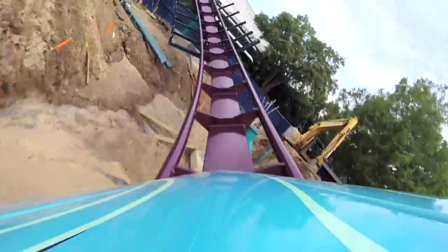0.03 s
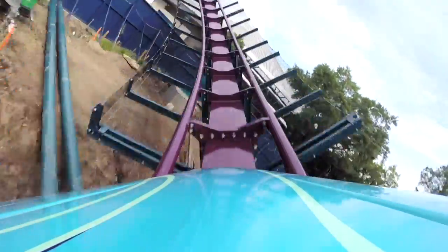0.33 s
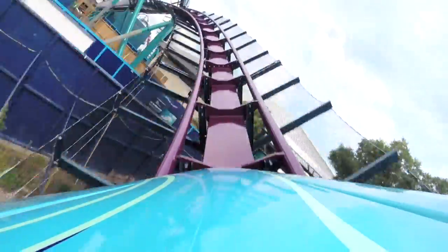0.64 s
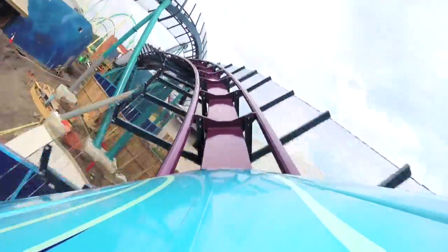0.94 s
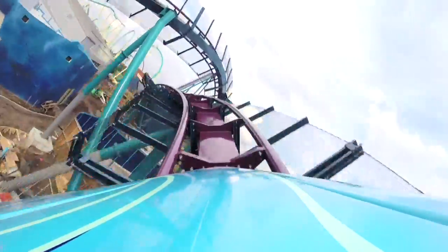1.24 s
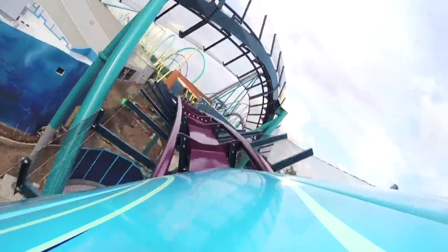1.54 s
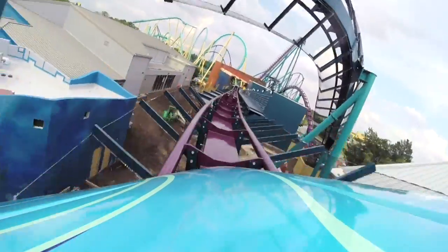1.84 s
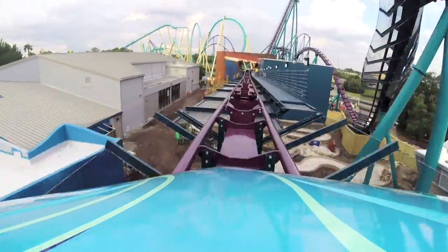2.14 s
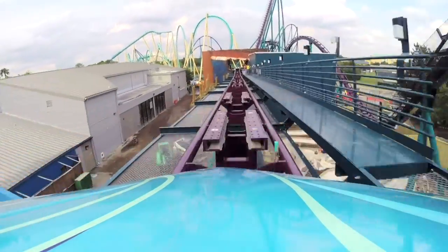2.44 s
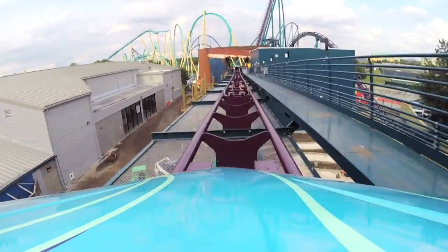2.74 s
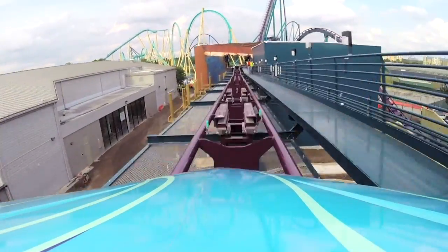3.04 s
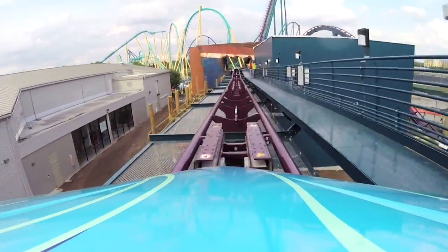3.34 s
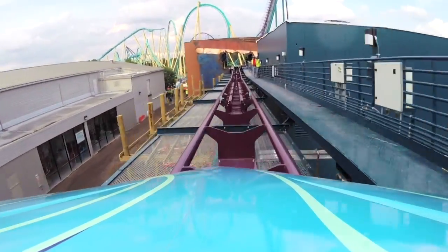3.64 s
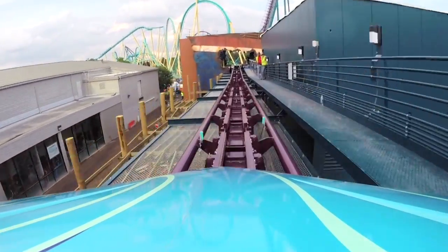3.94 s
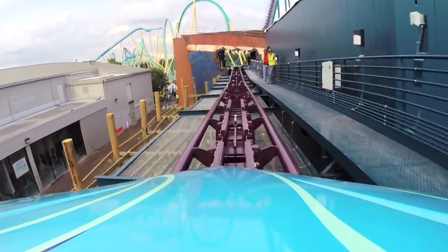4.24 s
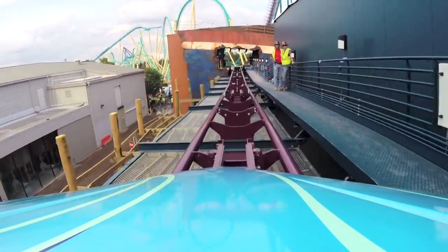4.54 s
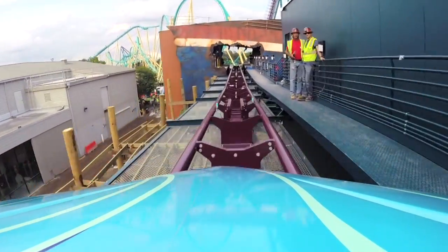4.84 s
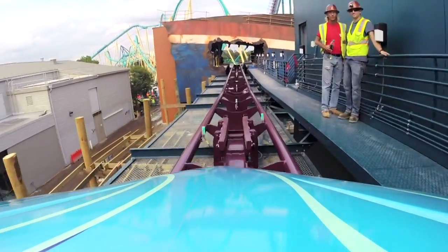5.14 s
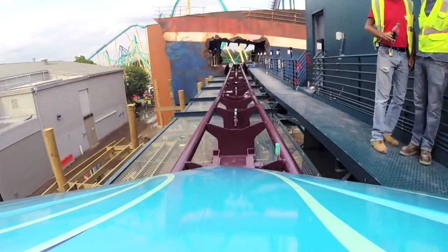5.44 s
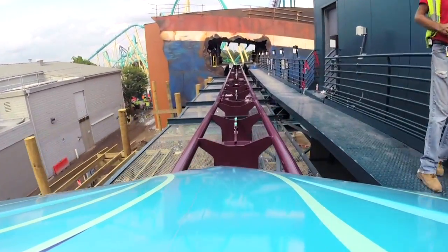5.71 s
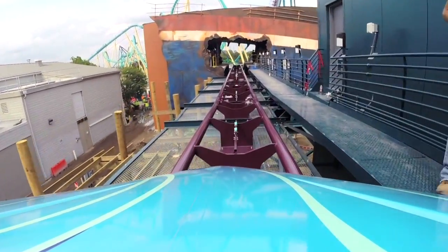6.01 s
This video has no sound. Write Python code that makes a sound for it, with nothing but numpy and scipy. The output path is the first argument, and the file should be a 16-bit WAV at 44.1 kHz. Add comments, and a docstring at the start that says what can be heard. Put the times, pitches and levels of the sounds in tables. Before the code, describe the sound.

A roller coaster train is heard close up from the nose of its front car, outdoors. From the start there is a deep rumble and a hollow, booming drone, with wheels roaring and rattling in surges. Rough rails knock the car at irregular moments, hardest around 0.1, 0.6, 1.1, 1.5, 2.0 and 2.6 seconds. Loose parts tick, and a thin wind hisses until about 2.7 seconds. From about 2.9 to 4.1 seconds the wheels judder in short, dense spells. At 4.2 seconds the brakes bite: five loud, ringing metal bangs follow in quick succession until about 4.9 seconds, over scraping and brief squeaks. A groaning tone sinks in pitch, dropping most just after 5 seconds. The scrape and rattle then fade, and the train rolls on more slowly with a low boom and a few small squeaks until about 6 seconds.

```python
"""A booming, rattling roar with hard jolts: a roller coaster train, heard from the front car's nose.
The wheels shake the nose shell and surge under load, rough rails knock the car, loose parts tick,
metal squeaks and a thin wind hisses past. From 4.2 s the train bangs through five brake units,
drags along them with a sinking groan and ringing steel, and rolls on more slowly."""
import sys
import numpy as np
from scipy import signal
from scipy.fft import rfft, irfft, next_fast_len
from scipy.io import wavfile
from scipy.ndimage import uniform_filter1d

SR = 44100
rng = np.random.default_rng(int(sys.argv[2]) if len(sys.argv) > 2 else 0)


def generate_wav(signal):
    """Clip the signal to [-1, 1] and save it as 16-bit WAV at the path in sys.argv[1]."""
    frames = np.transpose(np.atleast_2d(signal))
    scaled = np.clip(frames, -1, 1) * 32767
    pcm = np.round(scaled).astype(np.int16)
    wavfile.write(sys.argv[1], SR, pcm)


N = 272097
TIME_S = np.arange(N) / SR
BRAKES_GRIP_S, BRAKES_EASE_S = 4.212, 4.83


def from_db(db):
    """Decibels to gain."""
    return 10 ** (np.asarray(db) / 20)


def unit_rms(x):
    """Scale to rms 1."""
    return x / np.sqrt(np.mean(x ** 2) + 1e-20)


def curves(rows):
    """Each column after the time, interpolated at every sample."""
    times_s, *columns = np.transpose(rows)
    return [np.interp(TIME_S, times_s, column) for column in columns]


def noise():
    """White noise, rms 1."""
    return rng.standard_normal(N)


def steady(x, window_s):
    """Even out swells slower than the window; rms about 1."""
    size = int(window_s * SR) + 1
    power = uniform_filter1d(uniform_filter1d(x ** 2, size), size)
    return x / np.sqrt(np.abs(power) + 1e-14)


def wavering(hz, width_hz):
    """Noise-fed resonance: a tone of wandering strength and phase; rms 1."""
    pole = np.exp(-2 * np.pi * width_hz / SR)
    drift = signal.lfilter([1], [1, -2 * pole, pole * pole], rng.standard_normal((2, N + SR)))[:, SR:]
    phase = 2 * np.pi * np.cumsum(hz * np.ones(N)) / SR
    return unit_rms(drift[0] * np.cos(phase) + drift[1] * np.sin(phase))


def burst(start_s, rise_s, decay_s):
    """Envelope of one blow: quick rise, exponential fall."""
    age_s = np.clip(TIME_S - start_s, 0, 30 * decay_s)
    return (1 - np.exp(-age_s / rise_s)) * np.exp(-age_s / decay_s)


def swell(start_s, rise_s):
    """Envelope that peaks at 1 after rise_s, then dies."""
    age = np.clip((TIME_S - start_s) / rise_s, 0, 30)
    return age * np.exp(1 - age)


def impulses(times_s, levels_db):
    """One impulse at each time."""
    out = np.zeros(N)
    out[np.round(np.asarray(times_s) * SR).astype(int)] = from_db(levels_db)
    return out


def smear(hits, rise_s):
    """Turn each impulse into a swell of the same height."""
    pole = np.exp(-1 / (rise_s * SR))
    return signal.lfilter([np.e / (rise_s * SR)], [1, -2 * pole, pole * pole], hits + 1e-18)


def chatter(shake, floor, grain_db, window_s):
    """Loose contacts buzz above a floor, hardest on big shell swings; slow swells are evened out."""
    swing = np.maximum(shake, 0) ** 2
    return steady(noise() * (floor + swing) * from_db(grain_db * noise()), window_s)


def coasting_s():
    """Time since the brakes began to ease off."""
    return np.maximum(TIME_S - BRAKES_EASE_S, 0)


def brakes_on(attack_s=0.01):
    """Ramp from 0 to 1 as the brakes bite."""
    return np.clip((TIME_S - BRAKES_GRIP_S) / attack_s, 0, 1)


def brake_grip(release_s=0.6):
    """Brake force, 0-1: attack, hold, release."""
    return brakes_on() * np.exp(-coasting_s() / release_s)


# Nose shell resonances: (frequency [Hz], width [Hz], lift [dB])
SHELL_RESONANCES = [(361, 11, 2.5), (389.3, 60, 6), (545, 86, 7), (650, 15, -5), (883.5, 170, 6.5),
                    (1568, 170, 10), (1980, 250, 2.5), (2340, 440, 3), (4100, 1400, 3.5), (5300, 1600, 5.5)]


def through_shell(x, spectrum):
    """Filter by a source's spectrum and the shell's resonances; white noise keeps its level."""
    size = 2 * next_fast_len(N // 2 + SR // 4)
    hz = np.arange(size // 2 + 1) * SR / size
    points_hz, points_db = np.transpose(spectrum)
    gain_db = np.interp(np.log(hz + 1), np.log(points_hz), points_db)
    for centre_hz, width_hz, lift_db in SHELL_RESONANCES:
        gain_db += lift_db / (1 + (2 * (hz - centre_hz) / width_hz) ** 2)
    cepstrum = irfft(np.log(unit_rms(from_db(gain_db))))
    cepstrum[1:size // 2] *= 2
    cepstrum[size // 2 + 1:] = 0   # minimum phase: nothing rings before its cause
    return irfft(rfft(x, size) * np.exp(rfft(cepstrum)), size)[:N]


# Airstream: (time [s], level [dB])
WIND_LEVELS = [(0, -57), (.2, -62), (.6, -59.5), (.68, -67), (1.0, -61.5), (1.45, -62.5), (1.6, -68),
               (1.85, -63), (2.58, -59.5), (2.68, -70), (4.1, -76), (6.13, -75)]
# Air hiss: (frequency [Hz], relative level [dB])
WIND_SPECTRUM = [(1000, -8), (3300, 5), (4100, 0), (4750, -4), (5400, -2), (6500, -4), (8000, -9),
                 (10000, -16), (12000, -23), (16000, -36)]


def wind(shake):
    """Thin hiss of the airstream, fluttering as the nose shakes."""
    wind_db, = curves(WIND_LEVELS)
    flutter = chatter(shake, floor=2.2, grain_db=1, window_s=0.29)
    return from_db(wind_db) * through_shell(flutter, WIND_SPECTRUM)


# Bounce and buffeting: (time [s], relative level [dB])
RUMBLE_LEVELS = [(0.0, -15.5), (1.44, -14.5), (1.48, -21.5), (2.0, -13.5), (2.04, -21), (2.16, -13.5),
                 (2.21, -32), (2.31, -10), (2.89, -20), (3.5, -16), (3.6, -20), (4.11, -15.5), (4.3, -27),
                 (5.27, -22), (5.4, -12), (6.1, -17)]
# Air buffeting: (frequency [Hz], relative level [dB])
BUFFET_SPECTRUM = [(10, -22.5), (20, 0.5), (30, 4.5), (48, -3), (62, -15.5), (85, -4), (150, -32),
                   (2000, -110)]


def low_rumble(gain_db=-1):
    """The car bounces on its sprung wheels while the airstream buffets the nose."""
    rumble_db, = curves(RUMBLE_LEVELS)
    bounce = wavering(hz=41.5, width_hz=5)
    buffet = from_db(-6) * through_shell(noise(), BUFFET_SPECTRUM)
    return from_db(rumble_db + gain_db) * steady(bounce + buffet, window_s=0.51)


# Metal squeaks, pings, moans: (time [s], pitch [Hz], width [Hz], level [dB], half-length [s])
METAL_SQUEAKS = [(0.725, 3020, 230, -50, 0.0027), (3.371, 3460, 500, -42.5, 0.0011),
                 (4.488, 1353, 90, -27, 0.023), (4.494, 1585, 50, -36, 0.024), (4.66, 1353, 60, -34, 0.025),
                 (4.775, 1546, 80, -25, 0.0092), (4.947, 1506, 120, -28, 0.014),
                 (4.943, 3670, 900, -52, 0.015), (5.326, 856, 50, -32, 0.014),
                 (5.488, 2950, 200, -47, 0.0032), (5.655, 360, 50, -20, 0.029),
                 (5.818, 1063, 50, -37, 0.008), (5.833, 771, 45, -29.5, 0.016),
                 (5.839, 2520, 250, -54, 0.012), (5.842, 1796, 250, -51, 0.02),
                 (6.093, 669.6, 23, -35, 0.033), (6.096, 2377, 200, -58.5, .014)]


def squeaks():
    """Metal rubs or pings briefly at a rough pitch."""
    out = 0
    for time_s, hz, width_hz, level_db, half_s in METAL_SQUEAKS:
        tone = steady(wavering(hz, width_hz), window_s=0.0068)
        envelope = np.exp(-((TIME_S - time_s) / half_s) ** 2)
        out += from_db(level_db) * envelope * tone
    return out


# Sharpest ticks of loose parts: (time [s], relative level [dB])
SHARP_TICKS = [(0.122, -36), (0.148, -50), (0.158, -41.5), (0.3017, -33.5), (0.316, -46), (0.617, -44),
               (0.7243, -39.5), (0.945, -34), (1.126, -41), (1.212, -40.5), (1.3857, -35), (1.4972, -33),
               (1.5335, -55), (1.935, -36), (2.376, -34), (2.4154, -36), (2.6085, -33), (2.622, -34),
               (2.7232, -34.5), (3.1592, -45), (3.2265, -43), (3.3692, -37), (3.384, -40), (3.4934, -46),
               (3.5244, -37.5), (3.572, -47), (3.675, -38), (3.7204, -42), (3.7369, -43), (3.8366, -41),
               (3.877, -50), (3.924, -45), (3.9404, -45), (3.949, -42), (3.9798, -44), (4.0652, -40.5),
               (4.113, -43), (4.179, -41), (4.2248, -27), (4.255, -37), (4.3231, -36.5), (4.361, -30),
               (4.5191, -43), (4.571, -40), (4.5825, -31), (4.6952, -35), (4.7641, -37), (4.7715, -39),
               (4.8269, -37), (4.858, -36), (4.8963, -39), (4.9162, -41), (5.0723, -45), (5.1936, -44),
               (5.2485, -43.5), (5.3238, -44), (5.3567, -45), (5.4056, -36.5), (5.4445, -45),
               (5.4889, -33.5), (5.7588, -39.5)]
# Faint touches of loose parts: (time [s], relative level [dB])
STRAY_LEVELS = [(0, -49), (2.5, -51), (3.5, -47), (4.2, -46), (4.7, -42), (5.05, -50), (5.4, -52),
                (5.9, -65)]
# Dry tick: (frequency [Hz], relative level [dB])
TICK_SPECTRUM = [(600, -7), (1500, 2), (2500, 4), (3400, 3), (4700, -2), (5500, 0), (7300, -.5), (9000, -8),
                 (11000, -14), (15000, -32)]


def ticks(shake, play_rms=1.75, jolt_db=-26, clank_db=-29):
    """Loose parts tick on jolts and clanks, and faintly when the shell swings past their play."""
    sharp = impulses(*np.transpose(SHARP_TICKS))
    on_jolts = impulses(*np.transpose(RAIL_JOLTS)[:2])
    on_clanks = impulses(*np.transpose(BRAKE_CLANKS)[:2])
    knocks = sharp + from_db(jolt_db) * on_jolts + from_db(clank_db) * on_clanks
    stray_db, = curves(STRAY_LEVELS)
    touches = np.diff((shake > play_rms).astype(float), prepend=0) > 0
    strays = touches * from_db(stray_db + 3.5 * noise())
    contacts = smear(from_db(-9) * knocks + from_db(-16) * strays, rise_s=0.00055)
    return through_shell(contacts * noise(), TICK_SPECTRUM)


# Wheel drone: (time [s], pitch [Hz])
DRONE_PITCH = [(0, 182.4), (.45, 186), (.85, 201), (1.2, 195), (1.5, 168.8), (2.5, 160.6), (2.75, 186.4),
               (3.05, 189.3), (3.3, 174.8), (3.6, 159.1), (3.8, 174.9), (4.1, 171.6), (4.5, 192.3),
               (6.13, 183)]
# Low nose panel modes: (frequency [Hz], width [Hz], relative level [dB])
PANEL_MODES = [(113.3, 5.1, -1.5), (161.3, 28, -1), (202.3, 11, -7), (249.1, 18, -9)]
# Shell boom: (time [s], panel level [dB], drone level [dB])
BOOM_LEVELS = [(0, -20, -21), (0.9, -21, -21.5), (1.6, -19.5, -26), (2.5, -19.5, -23), (2.9, -24, -18),
               (4.1, -18, -18), (4.45, -25, -24.5), (5.25, -16, -28), (6.13, -20, -33.5)]


def shell_boom():
    """The nose booms with its panel modes and the wheels' drone."""
    drone_hz, = curves(DRONE_PITCH)
    panel_db, drone_db = curves(BOOM_LEVELS)
    modes = sum(from_db(db) * wavering(hz, width_hz) for hz, width_hz, db in PANEL_MODES)
    panels = steady(modes, window_s=0.45)
    drone = steady(wavering(drone_hz, width_hz=13.6), window_s=0.13)
    return from_db(panel_db) * panels + from_db(drone_db) * drone


# Spells of wheel judder: (start [s], length [s], level [dB])
JUDDER_SPELLS = [(0.08, 0.036, -40), (0.842, 0.062, -44.5), (1.021, 0.043, -41.5), (1.089, 0.037, -39.5),
                 (2.208, 0.035, -37.5), (2.544, 0.039, -41), (2.753, 0.051, -39), (2.881, 0.243, -37.5),
                 (3.215, 0.052, -35.5), (3.29, 0.047, -39.5), (3.381, 0.058, -40.5), (3.485, 0.062, -40.5),
                 (3.623, 0.024, -34), (3.669, 0.096, -36.5), (3.786, 0.02, -41.5), (3.886, 0.07, -36.5),
                 (3.978, 0.041, -38.5), (4.058, 0.013, -34.5), (4.113, .012, -36)]
# Wheel judder: (frequency [Hz], relative level [dB])
JUDDER_SPECTRUM = [(300, -7), (700, 16), (1000, 5), (1250, -3), (1700, -1), (2100, 0.5), (2550, -3.5),
                   (3000, -18), (4200, -27), (5500, -32), (15000, -72)]


def judder(shake, edge_s=0.0018):
    """The wheels judder in a dense rattle that sets in, holds and stops."""
    envelope = 0
    for start_s, length_s, level_db in JUDDER_SPELLS:
        inside_s = np.minimum(TIME_S - start_s, start_s + length_s - TIME_S)
        envelope += from_db(level_db) * np.clip(inside_s / edge_s + 0.5, 0, 1)
    buzz = chatter(shake, floor=3.6, grain_db=1.5, window_s=0.021)
    return envelope * through_shell(buzz, JUDDER_SPECTRUM)


# Rolling wheels: (time [s], relative roar [dB], relative rattle [dB])
ROLLING_LEVELS = [(0.0, -30, -45.5), (0.2, -37, -55), (0.85, -37.5, -56), (0.98, -33.5, -54),
                  (2.47, -34.5, -50), (2.7, -38.5, -49.5), (3.04, -32, -51.5), (3.96, -35, -55.5),
                  (4.15, -32.5, -52)]
# Wheels pressing harder on the rails: (time [s], extra roar [dB], extra rattle [dB])
LOAD_SURGES = [(0.109, 0.5, -1), (0.59, 6.5, 2.5), (1.101, 2.5, 0.5), (1.49, 2.5, 4.5), (1.889, 6.5, 2),
               (2.31, 6, 0.5), (2.59, 8, -0.5), (2.921, 3, 4.5), (3.3, 3, 3.5), (3.73, 5, 3),
               (4.001, 4, -1)]
# Wheel roar: (frequency [Hz], relative level [dB])
ROAR_SPECTRUM = [(120, -20), (250, -2.5), (330, -0.5), (450, -5.5), (650, -15), (900, -26.5), (1200, -32),
                 (2000, -47), (5000, -79), (15000, -120)]
# Wheel rattle: (frequency [Hz], relative level [dB])
RATTLE_SPECTRUM = [(300, -11.5), (700, 13), (1200, -2), (1700, -0.5), (2550, -6), (3100, -15.5),
                   (4200, -25.5), (4750, -30.5), (5500, -26.5), (7000, -40), (10000, -44), (15000, -63.5)]


def wheels(shake, roar_fade_db_per_s=6, rattle_fade_db_per_s=8.5, surge_half_s=0.087, thinning_s=0.25):
    """Rolling roar and rattle pulse with the shell, surge under load and fade as the train coasts."""
    roar_db, rattle_db = curves(ROLLING_LEVELS)
    roar_db += 2.5 - roar_fade_db_per_s * coasting_s()
    rattle_db += 8 - rattle_fade_db_per_s * coasting_s()
    for time_s, extra_roar_db, extra_rattle_db in LOAD_SURGES:
        load = np.exp(-((TIME_S - time_s) / surge_half_s) ** 2)
        roar_db += extra_roar_db * load
        rattle_db += extra_rattle_db * load
    roar = through_shell(chatter(shake, floor=1.7, grain_db=1.5, window_s=0.13), ROAR_SPECTRUM)
    floor = 0.78 * np.exp(-coasting_s() / thinning_s)   # rattle breaks into separate chatters
    rattle = through_shell(chatter(shake, floor, grain_db=2.5, window_s=0.092), RATTLE_SPECTRUM)
    return from_db(roar_db) * roar + from_db(rattle_db) * rattle


# Worst rail spots, relative levels: (time [s], knock [dB], clatter [dB], clatter rise [s], thump [dB])
RAIL_JOLTS = [(0.086, -19, -13.5, .0045, 2), (0.118, -22, -17, 0.0038, 3), (0.148, -25, -22, .002, -9),
              (0.156, -25, -15, .002, -10.5), (0.298, -23.5, -18.5, 0.0015, 0.5),
              (0.395, -29.5, -24.5, 0.0032, -18), (0.469, -27, -19, .0025, -4),
              (0.6, -19.5, -19.5, 0.0018, 2), (0.614, -24.5, -16, 0.0017, -5),
              (0.656, -25.5, -21.5, 0.0013, -20), (0.768, -31, -23, 0.0045, -13),
              (0.864, -31, -21.5, 0.0039, -1), (0.897, -27.5, -17, .002, -2),
              (0.91, -25.5, -18, 0.0018, -0.5), (0.937, -24, -20, .0015, -14),
              (1.017, -25.5, -19.5, 0.0017, -3.5), (1.125, -18.5, -14.5, 0.0014, 0),
              (1.154, -20, -15.5, .0025, -10), (1.209, -24.5, -20.5, 0.0026, -23),
              (1.292, -25, -24.5, 0.0015, -22), (1.316, -25.5, -23.5, .002, -17),
              (1.367, -28.5, -23.5, 0.0031, -14), (1.451, -26.5, -20, .002, -8),
              (1.495, -13, -13, .0014, 1), (1.532, -18.5, -12.5, 0.0014, -7),
              (1.933, -29, -22, 0.0027, -14), (2.036, -19.5, -14, 0.0026, -0.5),
              (2.279, -26, -22.5, 0.0058, -3), (2.389, -27, -23, 0.0014, -6.5),
              (2.583, -22, -19.5, .002, -22), (2.595, -20, -18.5, 0.0052, -6), (2.608, -18, -23, 0.0016, 0),
              (2.882, -20, -15, .003, -1.5), (2.968, -27.5, -24.5, 0.0017, -8.5),
              (3.078, -27, -16.5, .003, -4), (3.163, -28.5, -21, .002, -9),
              (3.25, -24.5, -19, 0.0028, -4.5), (3.31, -24.5, -20.5, 0.0022, -12),
              (3.359, -21, -17.5, 0.0027, -3.5), (3.492, -25, -19, 0.0022, -8.5),
              (3.572, -26, -17.5, 0.0026, -13.5), (3.671, -30, -24.5, 0.0021, -5),
              (3.736, -22, -14, 0.0027, -2), (4.171, -21, -14, 0.0038, 2.5), (5.296, -22, -23, .002, -14),
              (5.807, -30, -28, 0.0017, -21)]
# Knock and clatter: (frequency [Hz], relative level [dB])
JOLT_SPECTRUM = [(100, 19.5), (300, 4.5), (500, -1), (800, 4.5), (1200, -12), (2200, -11.5), (3200, -23.5),
                 (5000, -40.5), (9000, -43.5), (15000, -57.5)]


def jolts(bumps_per_s=6, bump_spread_db=4, thump_hz=195):
    """Rough spots knock, clatter and thump the shell; lesser bumps come at random until braking."""
    times_s, knock_db, _, _, thump_db = np.transpose(RAIL_JOLTS)
    bumps = (rng.random(N) < bumps_per_s / SR) * (1 - brakes_on()) * from_db(bump_spread_db * noise())
    clatter = sum(from_db(db) * swell(start_s, rise_s) for start_s, _, db, rise_s, _ in RAIL_JOLTS)
    clatter += from_db(-27.5) * smear(bumps, rise_s=0.0011)
    knocks = smear(impulses(times_s, knock_db), rise_s=0.00023)
    impacts = through_shell(knocks + clatter * noise(), JOLT_SPECTRUM)
    thump_envelope = smear(impulses(times_s, thump_db) + from_db(-13) * bumps, rise_s=0.0045)
    thumps = thump_envelope * np.sin(2 * np.pi * thump_hz * TIME_S)
    return from_db(-6.5) * thumps + from_db(-2) * impacts


# Brake steel modes: (frequency [Hz], gain [dB], t60 [s])
STEEL_MODES = [(330, -22.5, 0.33), (542, -7.5, 0.45), (660, -12.5, 0.4), (780, -15.5, 0.48),
               (913, -24, 0.29), (1080, -22.5, 0.098), (1209, -19.5, 0.11), (1320, -34, 0.4),
               (1380, -24.5, 0.42), (1502, -23.5, 0.3), (1694, -21, 0.21), (2200, -28, 0.37),
               (2290, -23.5, 0.37)]


def steel_ring(force, cutoff_hz=2300):
    """The brakes' steel rings in its modes under a rough, dull force."""
    lowpass = signal.butter(4, cutoff_hz, fs=SR, output="sos")
    drive = signal.sosfilt(lowpass, force * noise() + 1e-18)
    out = 0
    for k, (hz, gain_db, t60_s) in enumerate(STEEL_MODES):
        radius = from_db(-60 / (t60_s * SR))
        feedback = [1, -2 * radius * np.cos(2 * np.pi * hz / SR), radius ** 2]
        mode = np.sqrt((1 - radius ** 2) / 2) * signal.lfilter([1, 0, -1], feedback, drive)
        out += (-1) ** k * from_db(gain_db) * mode
    return out


# Sinking brake tone: (time [s], pitch [Hz], level [dB])
DRAG_TONE = [(4.22, 711, -32.5), (4.76, 682.8, -30.5), (4.84, 655, -29), (4.93, 648.5, -32),
             (5.04, 625, -30), (5.14, 490, -31), (5.28, 440.5, -24), (5.55, 440, -32.5), (6.13, 449.6, -40)]
# Partials of that tone: (pitch ratio, width [Hz], relative level [dB])
DRAG_PARTIALS = [(.81, 24, -6), (1, 19.5, 0), (1.21, 24, -9.5)]
# Brake groan: (frequency [Hz], relative level [dB])
GROAN_SPECTRUM = [(150, -8.5), (300, 3), (450, 0), (650, 2.5), (850, -8.5), (1100, -14), (1600, -53.5),
                  (4000, -59.5), (15000, -120)]
# Brake scrape: (frequency [Hz], relative level [dB])
SCRAPE_SPECTRUM = [(600, -8), (1100, 8.5), (1600, -2.5), (2350, -4.5), (2700, -14), (3100, -19),
                   (3600, -25), (4200, -21), (4650, -40), (7000, -42), (15000, -70)]


def brake_drag(shake, groan_fade_db_per_s=15, scrape_drop_db=23.5):
    """The brakes groan, scrape and rub the steel into ringing; their tones sink as the train slows."""
    groan_db = -24.5 - groan_fade_db_per_s * coasting_s()
    groan = from_db(groan_db) * steady(through_shell(noise(), GROAN_SPECTRUM), window_s=0.16)
    scrape_db = -35.5 - scrape_drop_db * (1 - brake_grip())
    friction = chatter(shake, floor=1, grain_db=0, window_s=0.049)
    scrape = from_db(scrape_db) * through_shell(friction, SCRAPE_SPECTRUM)
    tone_hz, tone_db = curves(DRAG_TONE)
    tones = sum(from_db(db) * steady(wavering(ratio * tone_hz, width_hz), window_s=0.064)
                for ratio, width_hz, db in DRAG_PARTIALS)
    steel = steel_ring(from_db(-29.5) * brake_grip() ** 2)
    return brakes_on() * (groan + scrape + from_db(tone_db) * tones) + steel


# Blows on the brake units:
# (time [s], relative blow [dB], blow decay [s], ring level [dB], ring pitch [Hz], ring rise [s])
BRAKE_CLANKS = [(4.21, -17, 0.0083, -8, 655, .007), (4.218, -12.5, 0.021, -20, 400, .008),
                (4.34, -15, 0.012, -5, 670, .0045), (4.357, -15, .012, -15, 560, .009),
                (4.483, -14.5, 0.02, -13, 780, .006), (4.494, -13, 0.018, -10, 630, .005),
                (4.639, -22, .01, -18, 640, .005), (4.649, -13.5, 0.02, -6, 665, .0045),
                (4.806, -15, 0.008, -11, 651, .027), (4.824, -14, 0.013, -13, 345, .006),
                (4.897, -19, 0.011, -16, 700, .006)]
# Brake bang: (frequency [Hz], relative level [dB])
CLANK_SPECTRUM = [(120, -34.5), (320, 4), (450, -7.5), (680, -2.5), (900, -13), (1400, -25.5),
                  (2300, -26.5), (3200, -38.5), (5000, -51.5), (9000, -59), (15000, -72)]


def brake_clanks():
    """Each brake unit catches the car with chattering bangs that ring at pitches of their own."""
    blows, rings = 0, 0
    for time_s, blow_db, decay_s, ring_db, ring_hz, ring_rise_s in BRAKE_CLANKS:
        blows += from_db(blow_db) * burst(time_s, rise_s=0.00055, decay_s=decay_s)
        tone = np.sin(2 * np.pi * ring_hz * (TIME_S - time_s))
        rings += from_db(ring_db) * swell(time_s, ring_rise_s) * tone
    steel = steel_ring(from_db(-3.5) * blows)
    bangs = from_db(1.5) * through_shell(blows * noise(), CLANK_SPECTRUM)
    return bangs + rings + steel


def scene():
    """Mono mix at the car's nose; the shell's boom drives the chatter of the other sources."""
    boom = shell_boom()
    shake = steady(boom, window_s=0.13)
    rumble = low_rumble()
    rolling = wheels(shake) + judder(shake) + jolts() + ticks(shake) + squeaks()
    return (rumble + boom + wind(shake) + rolling + brake_clanks() + brake_drag(shake))[None]


def gain_control(x, limit_db=-13.5, sense_s=0.059, recovery_db_per_s=30.5):
    """Gain that drops when the level passes the limit and climbs back at a steady rate."""
    pole = np.exp(-1 / (sense_s * SR))
    level_db = 10 * np.log10(signal.lfilter([1 - pole], [1, -pole], x ** 2) + 1e-12)
    excess_db = np.maximum(level_db - limit_db, 0)
    recovery_db = recovery_db_per_s * TIME_S
    return from_db(recovery_db - np.maximum.accumulate(excess_db + recovery_db, axis=-1))


def record(dry):
    """Gain control, short end fades, soft clipping at full scale, low-pass."""
    end_s, fade_s, cutoff_hz = 6.137, 0.004, 15700
    fades = np.clip(np.minimum(TIME_S, end_s - TIME_S) / fade_s, 0, 1)
    held = dry * gain_control(dry) * fades
    rounded = held / (1 + held ** 8) ** (1 / 8)
    return signal.sosfilt(signal.cheby2(12, 70, cutoff_hz, fs=SR, output="sos"), rounded)


dry = scene()
out = record(dry)
generate_wav(out)
```